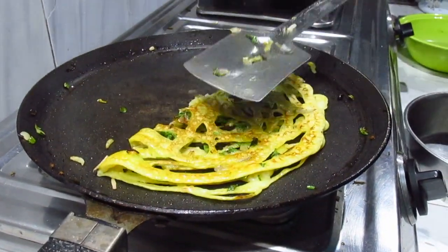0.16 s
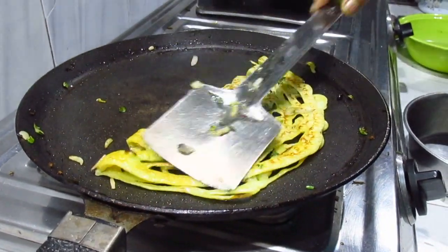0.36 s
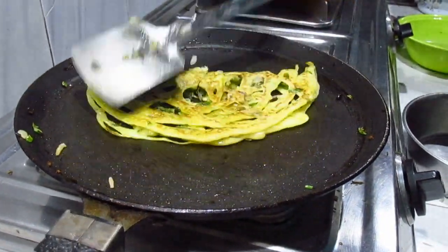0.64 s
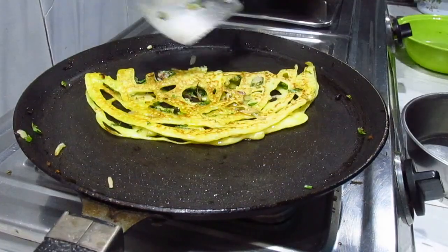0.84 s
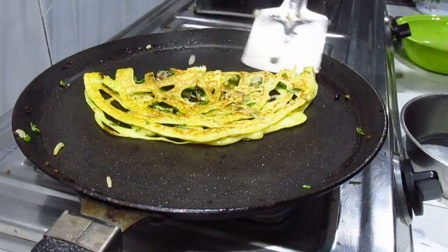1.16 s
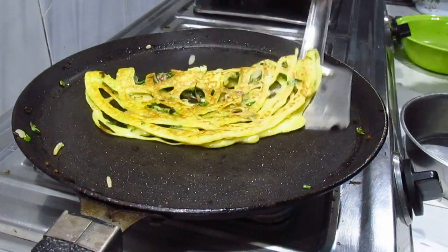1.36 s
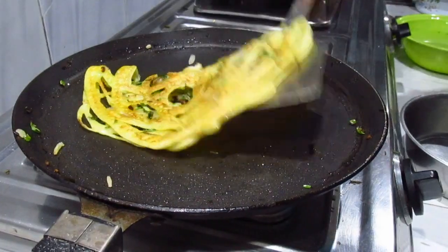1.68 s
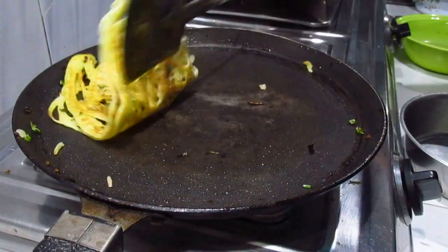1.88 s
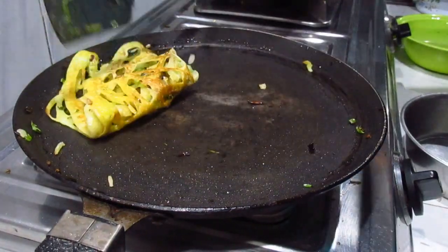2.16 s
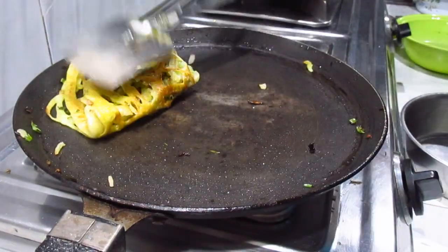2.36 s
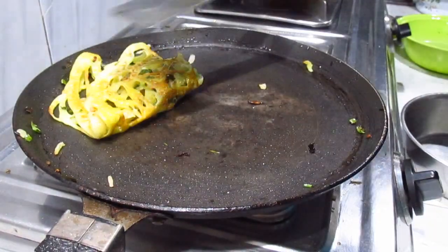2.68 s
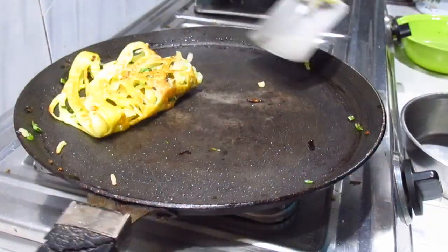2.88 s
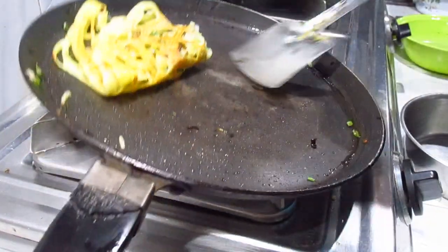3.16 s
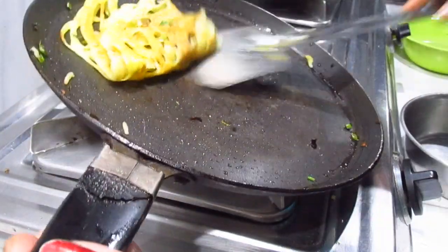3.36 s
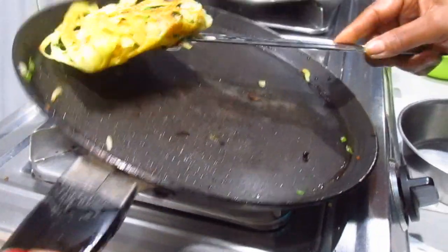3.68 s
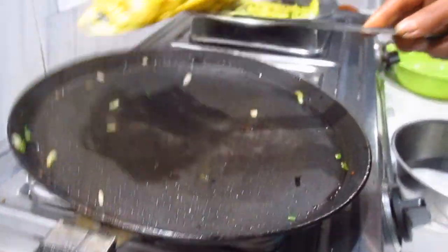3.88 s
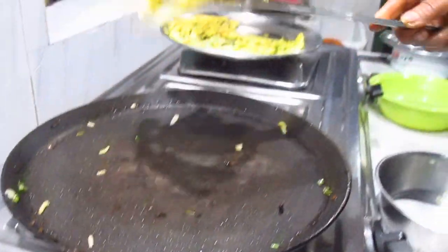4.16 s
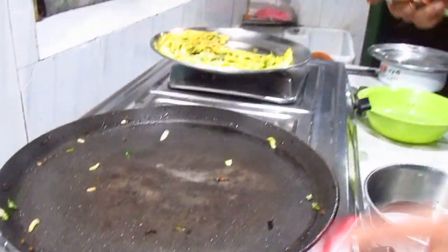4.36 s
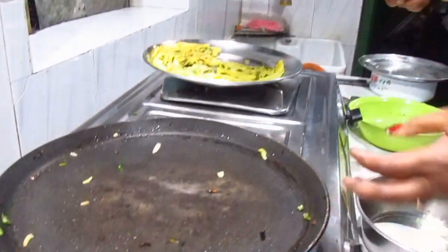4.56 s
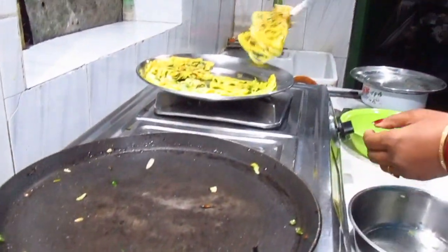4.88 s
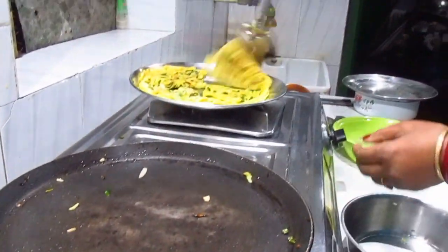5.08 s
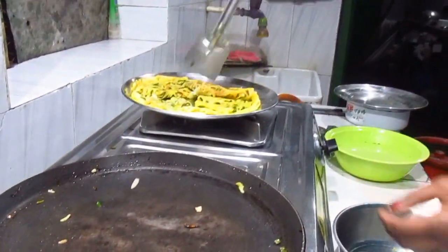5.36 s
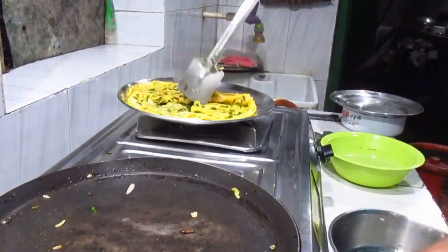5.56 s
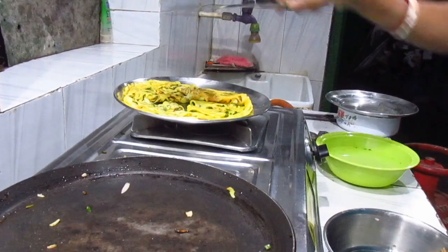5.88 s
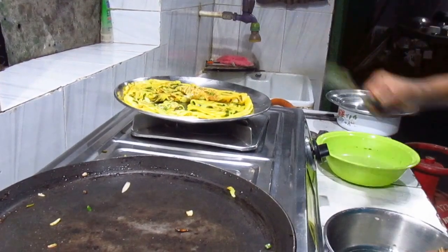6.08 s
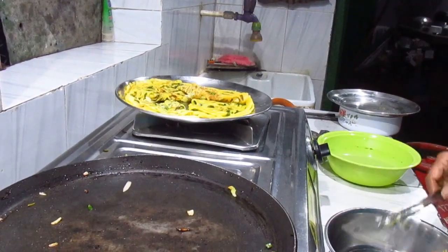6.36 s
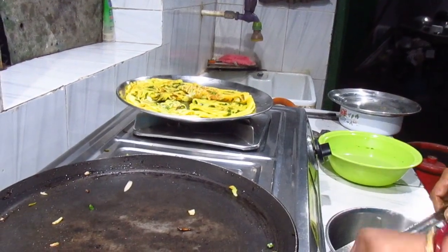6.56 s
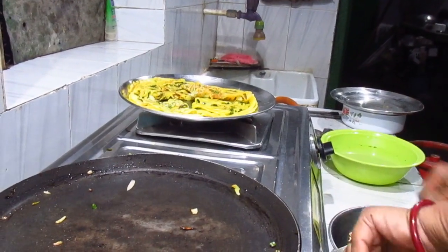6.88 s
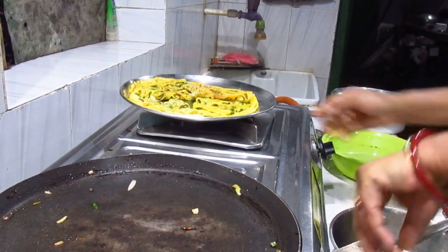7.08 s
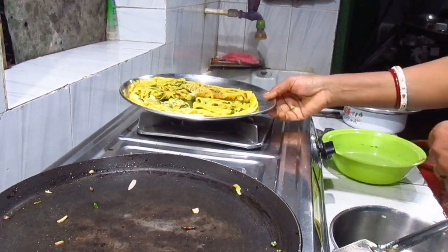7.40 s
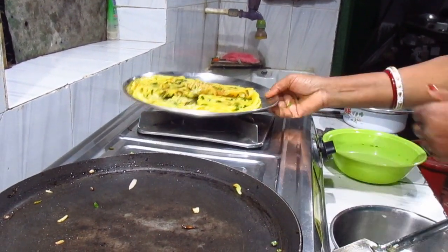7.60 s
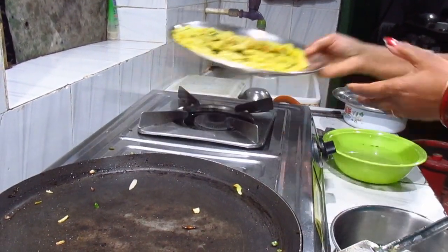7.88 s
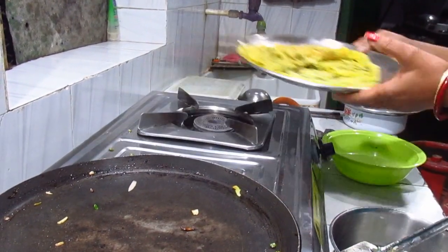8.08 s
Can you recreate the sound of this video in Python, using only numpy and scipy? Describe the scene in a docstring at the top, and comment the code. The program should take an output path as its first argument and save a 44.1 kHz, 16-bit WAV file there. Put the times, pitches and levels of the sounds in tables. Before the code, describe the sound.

Light sizzle and spitting fat, a steel spatula tapping and scraping an iron griddle, then griddle clanks and sharp counter knocks in a small tiled kitchen.

```python
"""A steel spatula taps and scrapes an iron griddle: random clicks ring a set of resonances.
A pancake sizzles in fat, made of dense tiny clicks, fizzing crackle and short noise bursts.
The griddle is dragged and set down on the stove; the spatula brushes a steel plate and drops on the counter.
Far off, low swells thud in a fairly steady beat with gaps; rumble and hiss of the house lie below.
A small tiled kitchen adds echoes, and two close microphone ports pick it all up."""
import sys
import numpy as np
from scipy import signal
from scipy.fft import rfft, irfft, next_fast_len
from scipy.io import wavfile
from scipy.ndimage import uniform_filter1d

SR = 44100
rng = np.random.default_rng(int(sys.argv[2]) if len(sys.argv) > 2 else 0)


def unload_wav(signal):
    """Save mono or channel-first audio to the path in sys.argv[1] as 16-bit WAV at rate SR, clipped to [-1, 1]."""
    wavfile.write(
        sys.argv[1],
        SR,
        np.round(np.clip(np.atleast_2d(signal).T, -1, 1) * 32767).astype(np.int16),
    )


N = 362943

# Contact sounds are levelled in four bands: bass, low, middle and high (edges in Hz)
SPLITS = [signal.butter(4, edges, kind, fs=SR, output="sos") for edges, kind in (
    ((215, 540), "band"), ((540, 1200), "band"), ((1200, 3500), "band"), (3500, "high"))]


def gain_of(db):
    """Turns decibels into an amplitude factor."""
    return 10 ** (np.asarray(db) / 20)


def evened(x):
    """Scales a sound to an rms (average strength) of 1."""
    return x / np.sqrt(np.mean(x ** 2) + 1e-20)


def read(points, hz):
    """Reads a curve between its points, with frequency on a log scale."""
    f, value = np.transpose(points)
    return np.interp(np.log(hz + 1), np.log(f + 1), value)


def add(mix, s, sound):
    """Mixes a sound in, starting at s seconds."""
    part = mix[max(round(s * SR), 0):][:len(sound)]
    part += sound[:len(part)]


def shaped(x, gain):
    """Filters x by a gain that depends on frequency."""
    size = next_fast_len(x.shape[-1] + 4096)
    hz = np.fft.rfftfreq(size, 1 / SR)
    return irfft(rfft(x, size) * gain(hz), size)[..., :x.shape[-1]]


def grit(size, per_s, spread_db):
    """Makes random clicks like a rough surface does: most are small, a few large."""
    where = rng.random(size)
    sign = rng.standard_normal(size)
    chance = rng.exponential(1, size)
    return (where < per_s / SR) * sign * gain_of(spread_db * np.minimum(chance, 4))


def air():
    """Lumpy low rumble and faint hiss of the house: filtered noise, as a sum and an unrelated difference."""
    # the background sinks and swells: t/s, rumble level before the lumps/dB
    swings = [(0.0, -57.5), (0.9, -53), (1.25, -57), (1.38, -56), (1.55, -58), (2.9, -53), (3.33, -59.5),
              (3.45, -71), (3.6, -56.5), (3.8, -53), (4.0, -53.5), (4.24, -73.5), (4.47, -68),
              (4.95, -61.5), (5.6, -59), (6.85, -51.5), (7.4, -55.5), (8.23, -55.5)]
    # balance of the rumble: f/Hz, relative level/dB
    rumble_colour = [(12, -35), (20, -17.5), (75, 0), (109, -3.5), (155, 1), (186, -7), (220, -17.5),
                     (297, -40), (450, -16.5), (580, -35), (990, -120)]
    # balance of the hiss: f/Hz, relative level/dB
    hiss_colour = [(150, -22), (250, 4), (439, -0.5), (562, -1), (621, 5.5), (674, -0.5), (1590, -3.5),
                   (1730, -6), (5690, -3.5), (11400, -9), (12200, -2.5), (13000, -57)]
    t = np.arange(N) / SR
    s, rumble_db = np.transpose(swings)
    # the hiss is -53 dB when the rumble is -55 dB, and follows 0.68 of each swing
    hiss_db = -53 + 0.68 * (rumble_db + 55)
    # slow waves of 2 to 14 Hz make the level uneven
    lumps = evened(sum(np.sin(2 * np.pi * (f * t + rng.random())) for f in np.geomspace(2, 14, 12)))
    out = np.zeros((2, N))
    for colour, db, lump_db in ((rumble_colour, rumble_db, 2.5), (hiss_colour, hiss_db, .4)):
        noise = shaped(rng.standard_normal((2, N)), lambda hz: gain_of(read(colour, hz)))
        out += evened(noise) * gain_of(np.interp(t, s, db) + lump_db * lumps)
    return out


def kitchen(x):
    """Sparse echoes of random sign, each band dying at its own speed; sum and difference get their own."""
    # how fast echoes die: f/Hz, time to fall by 60 dB/s
    decay = [(200, 0.74), (700, 0.34), (2000, 0.39), (5000, 0.27), (11000, 0.34)]
    taps = np.zeros((2, SR // 2))
    # one echo at a random place in every 20 samples
    at = np.arange(160, SR // 2 - 20, 20)
    places = at + rng.integers(0, 20, (2, len(at)))
    np.put_along_axis(taps, places, rng.choice([-1., 1.], (2, len(at))), 1)
    hz, t, z = signal.stft(taps, SR, nperseg=256)
    dying = gain_of(-60 * t / read(decay, hz)[:, None])
    tail = signal.istft(z * dying, SR, nperseg=256)[1]
    return signal.fftconvolve(x[None], tail / np.linalg.norm(tail[0]), axes=1)[:, :N]


def thuds():
    """Padded far-off blows: a soft swell holds a short low tone and a brief noisy slap."""
    # dull thuds: t/s, level/dB, pitch/Hz, slap against tone/dB
    thud_list = [(0.383, -33, 190, 0.5), (0.74, -29, 172, -5.5), (0.998, -32.5, 123, 0),
                 (1.313, -34, 200, -12), (1.535, -34.5, 185, -4), (1.812, -36, 202, -6),
                 (2.073, -30.5, 200, -8), (2.32, -27.5, 147, -4.5), (2.592, -30.5, 166, -3.5),
                 (2.818, -31.5, 129, -6), (3.311, -30, 175, -5), (3.543, -32.5, 180, -11),
                 (3.765, -32, 262, -21), (4.301, -47, 164, -5), (4.545, -43, 171, -6.5),
                 (6.248, -24.5, 173, -15.5)]
    mix, t = np.zeros(N), np.arange(3000) / SR
    swell = (t / .009) ** 7 * np.exp(7 - 7 * t / .009)  # strongest at 9 ms
    for s, db, hz, slap_db in thud_list:
        low = np.sin(2 * np.pi * hz * (t - .009))
        noise = rng.standard_normal(len(t))
        slap = evened(shaped(noise, lambda f: f / 250 / (1 + (f / 400) ** 2.52)))
        add(mix, s, gain_of(db) * swell * (low + gain_of(slap_db) * slap))
    return mix


def pops():
    """Bursting drops of fat and small ticks: noise with a sharp start that falls by 60 dB in 20 ms."""
    # single spits and ticks: t/s, peak level of the middle/dB, high against middle/dB
    pop_list = [(0.0854, -27, 17), (0.1191, -24.5, 11), (0.1471, -23, 12.5), (0.176, -27.5, 8),
                (0.2184, -38, 22), (0.2294, -23, 4.5), (0.241, -23.5, 6.5), (0.3895, -18.5, -30),
                (0.5297, -16.5, -2), (0.5734, -18.5, -3.5), (1.5938, -26, 3.5), (1.6581, -30, -6),
                (1.6701, -26, 0), (1.7784, -31, 4), (1.7953, -17, -5), (1.8224, -16, -4),
                (1.8587, -35, -14), (2.0722, -24, -9), (2.17, -23, -23), (2.2019, -25, -16),
                (2.3236, -21.5, -2), (2.5386, -18, -20), (2.6259, -28, -13), (2.6623, -21.5, -3),
                (2.7626, -24, 13), (3.9245, -22, -2.5), (4.2694, -43, 3), (4.6344, -55, 18),
                (4.6573, -41, 14), (4.6997, -40, -17), (4.8065, -27.5, -37), (6.4383, -28.5, 0.5),
                (7.2145, -48, 15.5)]
    mix, t = np.zeros(N), np.arange(3000) / SR
    for s, db, high_db in pop_list:
        fading = gain_of(-60 * t / .02) + 1.8 * np.exp(-t / .0004)
        burst = rng.standard_normal(len(t)) * fading
        middle = shaped(burst, lambda hz: np.exp(-(np.log((hz + 1) / 3000) / 0.5) ** 2))
        high = shaped(burst, lambda hz: np.exp(-(np.log((hz + 1) / 9000) / 0.5) ** 2))
        both = middle / abs(middle).max() + gain_of(high_db) * high / abs(high).max()
        add(mix, s, gain_of(db) * both)
    return mix


def sizzle():
    """Hot fat: a bed of dense clicks for countless tiny bubbles, under looser, louder crackle."""
    # hiss of the hot fat: t/s, level/dB
    frying = [(0.0, -34.5), (0.25, -45), (1.08, -45), (2.07, -47.5), (3.27, -46.5), (4.08, -51.5),
              (4.3, -67)]
    # the fat flares up and spits, then calms: t/s, top level/dB, calming/dB per s
    crackle = [(0.014, -29.5, 144), (0.225, -41, 300), (0.325, -47, 100), (0.394, -41, 133),
               (0.745, -45, 200), (1.815, -35, 15), (2.034, -41.5, 215), (2.168, -42.5, 350),
               (2.45, -47, 60), (2.539, -37.5, 205), (2.62, -50.5, 40)]
    # balance of bed and crackle: f/Hz, relative level/dB
    fry_colour = [(180, 3.5), (300, -19.5), (424, -1), (521, -10), (1040, 1), (1500, 0.5), (3140, 4),
                  (7850, -3), (11500, -0.5), (12200, 1.5), (13000, -60)]
    flare_s = 0.0097  # each flare rises this long before its time in the table
    t = np.arange(N) / SR

    def colour(hz):
        """The hot fat gives no sound below 150 Hz."""
        return gain_of(read(fry_colour, hz)) * (hz > 150)

    s, db = np.transpose(frying)
    bed = evened(shaped(grit(N, 15000, 1.0), colour)) * gain_of(np.interp(t, s, db, right=-120))
    # each spit fizzes, with a fade constant of 100 samples (2.3 ms)
    fizz = signal.oaconvolve(abs(grit(N, 1500, 1.24)), np.exp(-np.arange(200) / 100.0))[:N]
    spits = evened(shaped(fizz * rng.standard_normal(N), colour))
    flares = np.zeros(N)
    for s, db, calm_db in crackle:
        rise = np.clip((t - s) / flare_s + 1, 0, 1)
        flares += rise * gain_of(db - calm_db * np.maximum(t - s, 0))
    return bed + spits * flares


def ring(x, modes, spread_db, direct_db):
    """A struck body: each listed mode is three close ones, and the place of contact sets their strength."""
    f, width, db = np.repeat(np.transpose(modes), 3, axis=1)[:, :, None]
    offset = np.tile([-.9, 0, 1], len(modes))[:, None]
    f = f + width * (offset + .1 * rng.standard_normal(f.shape))
    half = np.maximum(.45 * width, 14)  # half the width of each single mode, Hz
    strength = gain_of(db - db.max() + spread_db * rng.standard_normal(f.shape))
    strength *= (-1) ** np.arange(len(f))[:, None]  # neighbouring modes swing in opposite sense

    def response(hz):
        """The contact itself, duller above 6 kHz, plus all the modes."""
        direct = 1j * gain_of(direct_db) / (1 + 1j * hz / 6000)
        return direct + (strength * half / (half + 1j * (hz - f))).sum(0)

    return shaped(x, response)


def resonate(x, hz, width):
    """A resonance, width in Hz, whose pitch follows the curve hz."""
    turn = np.exp(2j * np.pi * np.cumsum(hz) / SR)
    r = np.exp(-np.pi * width / SR)
    return (turn * signal.lfilter([1 - r], [1, -r], x / turn)).real


def blade_flex(bands, catch, slack_db, edge_hz):
    """The pressed blade bends in two modes 2.76 apart that rise with pressure, and its edge sings high."""
    rest_hz, pressed_hz = 675, 838
    # pressure is full down to 7.5 dB under the loudest moment and gone at 22.5 dB, then smoothed
    press = uniform_filter1d(np.clip(1.5 - slack_db / 15, 0, 1), size=2000)
    flex = rest_hz + (pressed_hz - rest_hz) * press
    first_bend = evened(resonate(resonate(catch, flex, 110.), flex, 110.))
    second_bend = evened(resonate(catch, 2.76 * flex, 90.))
    edge = evened(resonate(catch, edge_hz, 150.0))
    bands[1] = evened(bands[1] + 1.7 * first_bend)
    bands[2] = evened(bands[2] + .65 * second_bend)
    bands[3] = evened(bands[3] + 0.7 * edge)


def stroke(mix, strokes, modes, tone, per_s, spread_db, direct_db):
    """An edge catching on a rough surface: dense clicks ring the body; slack contact sounds duller."""
    bass_db, low_gain, high_loss = tone
    for t, db, low_db, high_db, *edge_hz in strokes:
        catch = grit(len(t), per_s, spread_db)
        # the contact passes four places, each with its own balance of modes (spread 4.5 dB)
        travel = 3 * (t - t[0]) / (t[-1] - t[0])
        body = np.zeros(len(t))
        for place in range(4):
            nearness = np.sqrt(np.clip(1 - abs(travel - place), 0, 1))
            body += ring(catch * nearness, modes, 4.5, direct_db)
        bands = [evened(signal.sosfilt(split, body)) for split in SPLITS]
        slack_db = db.max() - db  # how far the contact has slackened
        if edge_hz:
            blade_flex(bands, catch, slack_db, edge_hz[0])
        low = db + low_db + low_gain * slack_db
        bass = low + bass_db + low_gain * slack_db
        high = db + high_db - high_loss * slack_db
        sound = sum(band * gain_of(level) for band, level in zip(bands, (bass, low, db, high)))
        add(mix, t[0], sound * signal.windows.tukey(len(t), .12))


def arched(rows):
    """Light strokes as (times, level, low share, high share): a rise to the peak and a fall."""
    rise_db, fall_db = 14.5, 29.5  # a stroke starts and ends this far under its peak
    rounded = 1.37  # 1 = pointed peak, 2 = round
    for start, peak, end, db, low_db, high_db in rows:
        t = np.arange(start, end, 1 / SR)
        away = np.interp(t, (start, peak, end), (-1, 0, 1))
        drop_db = np.where(away < 0, rise_db, fall_db) * abs(away) ** rounded
        yield t, db - drop_db, low_db, high_db


def pushed():
    """The two hard strokes as (times, level, low share, high share, edge tone)."""
    # the blade pushed under the pancake, one curve a stroke: t/s, middle level/dB, edge tone f/Hz
    push_curves = [
        [(1.09, -46, 4100), (1.204, -43, 4400), (1.302, -25, 4170), (1.32, -19.5, 4190), (1.364, -20.5, 4100),
         (1.384, -24, 4200), (1.416, -21.5, 4270), (1.57, -66, 4400)],
        [(3.31, -45, 4400), (3.336, -33, 4300), (3.366, -33.5, 5130), (3.38, -22.5, 5290), (3.422, -16.5, 5620),
         (3.49, -26.5, 4830), (3.516, -31.5, 5300), (3.544, -47, 4610), (3.6, -41, 4390)],
    ]
    low_db, high_db = -10, 2  # low and high against middle at the loudest moment
    for rows in push_curves:
        s, db, edge_hz = np.transpose(rows)
        t = np.arange(s[0], s[-1], 1 / SR)
        yield t, np.interp(t, s, db), low_db, high_db, np.interp(t, s, edge_hz)


def blows(mix, rows, modes, direct_db, bass_db):
    """A sharp contact and a dying rattle ring the body; the bass follows the low share from bass_db."""
    boom = 1.28  # dB of bass that a blow gains with each dB of low share
    t = np.arange(12000) / SR
    for s, db, low_db, high_db, t60 in rows:
        rattle = gain_of(-60 * t / max(t60, .01))
        contact = 2.3 * np.exp(-t / 0.0038)
        push = rng.standard_normal(len(t)) * (rattle + contact) * np.minimum(t / 0.00045, 1)
        body = ring(push, modes, 0.79, direct_db)
        shares_db = (boom * low_db + bass_db, low_db, 0, high_db)
        for split, share_db in zip(SPLITS, shares_db):
            band = signal.sosfilt(split, body)
            # each band is levelled by its first 15 ms
            add(mix, s, 0.21 * band / np.std(band[:660]) * gain_of(db + share_db))


def metalwork():
    """Every scrape and knock of spatula, griddle, plate and counter, each on its own ringing body."""
    # what each thing rings with: f/Hz, spread of its close modes/Hz, relative level/dB
    griddle = [(658, 13.3, 9), (962, 60, 7.5), (1110, 400, -4), (1430, 210, -9), (1793, 111, 10.5),
               (2303, 150, 10.5), (2956, 170, -1.5), (3030, 180, -16), (4240, 140, 9.5), (4820, 320, 3.5),
               (5350, 210, 6), (6170, 310, 4.5), (6910, 230, 0.5), (8700, 160, 3.5), (10670, 210, -38)]
    pancake = [(1580, 710, 31), (2600, 1400, -20.5), (5000, 11000, -12), (9040, 5300, -25)]
    stove = [(272.4, 18, 9.5), (462.5, 62, 7.5), (600, 45, 5), (689, 46.5, 4.5), (836, 180, -17.5),
             (1170, 180, -19), (1706, 100, -14.5), (2396, 99, -6), (2880, 260, -13.5), (3880, 660, -16),
             (4530, 210, 7), (5100, 310, 9.5), (5760, 600, 6), (6920, 910, 1.5), (8700, 280, -7.5)]
    plate = [(316, 124, -12), (660.6, 32, -5), (897, 86, -21), (1516, 138, -17), (1930, 210, -15.5),
             (2633, 200, -12.5), (3660, 360, -20), (4620, 420, -18.5), (6020, 170, -16.5)]
    counter = [(380, 71, 1.5), (563, 113, 3), (712, 88, -2), (975, 110, -12), (1252, 180, -1.5),
               (1530, 61, 4), (2030, 65, -10), (2970, 34, -5), (3700, 61, -15), (4050, 350, -12),
               (4820, 330, -1), (5910, 240, 6.5), (7080, 390, -4), (8800, 390, -4)]
    # lighter strokes: start t/s, peak t/s, end t/s, middle peak level/dB, low and high against it/dB
    blade_on_pancake = [(0.0, 0.03, 0.15, -37, -8, 7), (0.45, 0.54, 0.77, -34.5, -16, 1.5)]
    griddle_on_stove = [(2.81, 2.83, 2.92, -38.5, 0, -3.5), (3.195, 3.23, 3.4, -41, 2.5, -25),
                        (3.58, 3.675, 3.81, -39, 10, -21)]
    blade_on_plate = [(5.08, 5.12, 5.33, -51.5, 4, -5), (5.61, 5.67, 5.77, -45, 5, -4),
                      (5.78, 5.82, 5.88, -73.5, 19, 1), (5.92, 5.94, 6.13, -54.5, 17.8, -5),
                      (7.42, 7.47, 7.64, -41.5, 9, -10), (7.5, 7.565, 7.69, -39, 1, -9)]
    # blows: t/s, middle level/dB, low and high against it/dB, time for the rattle to fall 60 dB/s
    griddle_taps = [(1.052, -7, -8, 1, 0.079), (1.1175, -39.5, -3, -12, 0.1)]
    stove_knocks = [(2.9267, -6, -3, -10, 0.14), (3.024, -20.5, 7, -20, 0.15), (3.2018, -29, -3, -18, 0.25),
                    (3.869, -23, 8.5, -13, 0.25), (4.0082, -1, -7.5, -2, 0.16),
                    (4.1642, -24.5, -1.5, -19, 0.27), (4.2014, -30, -5, -23, 0.15),
                    (4.424, -51, 13, 5.5, 0.42)]
    plate_taps = [(5.1103, -32.5, -0.5, -8, 0.076), (5.1463, -36, 1.5, 2, 0.66),
                  (5.9284, -45, 15.5, -10, 0.065), (5.9841, -39.5, 14.5, -16, 0.1),
                  (7.2882, -34, 4.5, -2, 0.24)]
    counter_knocks = [(6.573, -22, 12.5, -26, 0.11), (6.5768, -10.5, -6.5, -16, 0.22),
                      (6.681, -42.5, 16.5, -10, 0.064), (6.785, -6, -7, -6.5, 0.2),
                      (6.7955, -35, -42, 19, 0.1), (6.8896, -37, 13.5, -6, 0.15),
                      (6.972, -22.5, 12.5, -12, 0.2), (6.9894, -26, 14.5, -22, 0.044)]
    mix = np.zeros(N)
    # tone of a surface: bass against low (dB), then per dB of slackening:
    # dB gained by the low (the bass gains twice that) and dB lost by the high
    stroke(mix, pushed(), griddle, (-36, 0.43, 0.11), 9000, 3.9, -10)
    stroke(mix, arched(blade_on_pancake), pancake, (-12, 0.4, .05), 8000, 4.5, 12)
    stroke(mix, arched(griddle_on_stove), stove, (-4.5, 0.17, .05), 3800, 4.3, -10.5)
    stroke(mix, arched(blade_on_plate), plate, (-9, 0.15, .05), 6000, 1.05, -34.0)
    blows(mix, griddle_taps, griddle, -11.5, -5)
    blows(mix, stove_knocks, stove, -13.0, -8)
    blows(mix, plate_taps, plate, -7.0, -3)
    blows(mix, counter_knocks, counter, -15.0, -9)
    return mix


def scene():
    """Direct sound, echoes and background reach two close ports, built from their sum and difference."""
    # difference of the two ports against their sum: f/Hz, level/dB
    port_gap = [(40, -7), (100, -11), (250, -14), (600, -16), (1100, -12), (2200, -.5), (4000, 2),
                (8000, .5), (12000, -1.5)]
    # phase of that difference: f/Hz, phase/rad
    port_turn = [(300, -1.45), (1000, -1.45), (2200, -.7), (4000, -1.6), (8000, -1.65), (12000, -.5)]
    left_db = .4  # the left port is raised by this much, the right one lowered
    metal, fat, far = metalwork(), sizzle() + pops(), thuds()
    echo = kitchen(gain_of(-8.5) * metal + gain_of(-14.0) * fat + gain_of(-15) * far)
    near = gain_of(-3.0) * (metal + fat + far)
    # first reflections off tiles and hob reach the ports unequally; they fade over 160 samples
    bounce = rng.standard_normal(600) * np.exp(-np.arange(600) / 160)
    reflected = signal.oaconvolve(near, bounce / np.linalg.norm(bounce))[:N]
    skew = .6 * near + .8 * reflected
    total, gap = np.array([near, skew]) + echo + air()
    gap = shaped(gap, lambda hz: gain_of(read(port_gap, hz)) * np.exp(1j * read(port_turn, hz)))
    return np.array([total + gap, total - gap]) * gain_of([[left_db], [-left_db]])


def record(dry):
    """The loudest peaks meet a soft ceiling; then a steep filter takes away the highest treble."""
    ceiling, edge_hz = .9, 12060
    soft = ceiling * np.tanh(dry / ceiling)
    band_limit = signal.firwin(1201, edge_hz, window=("kaiser", 9), fs=SR)
    return signal.oaconvolve(soft, band_limit[None], "same")


dry = scene()
out = record(dry)
unload_wav(out)
```